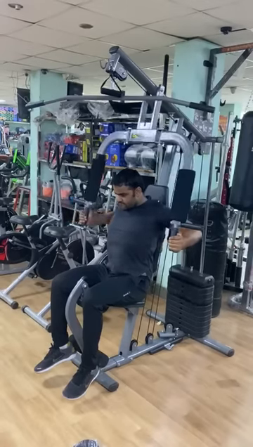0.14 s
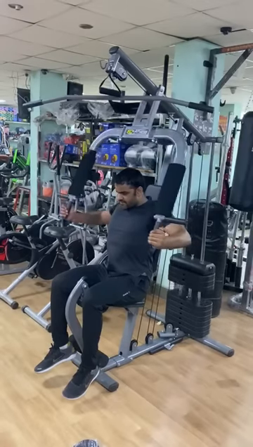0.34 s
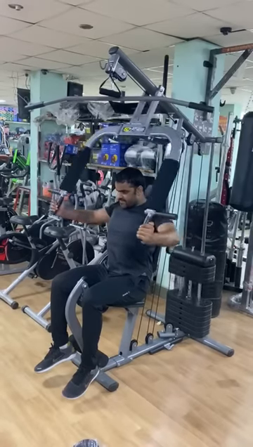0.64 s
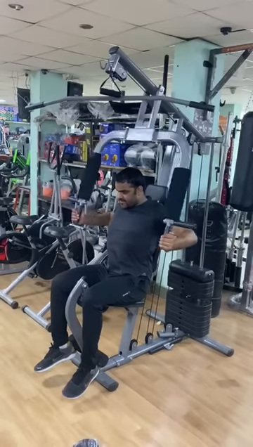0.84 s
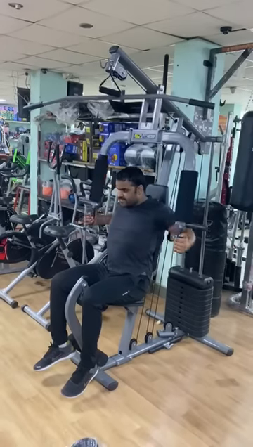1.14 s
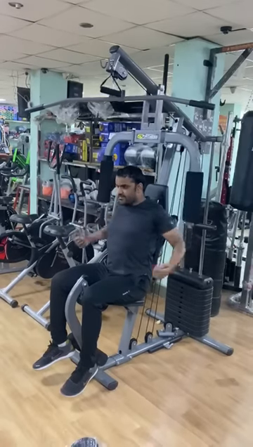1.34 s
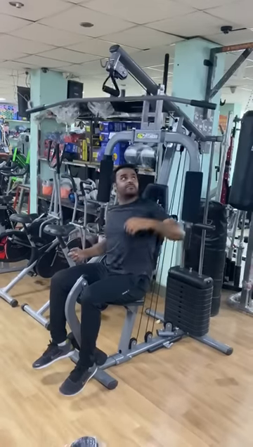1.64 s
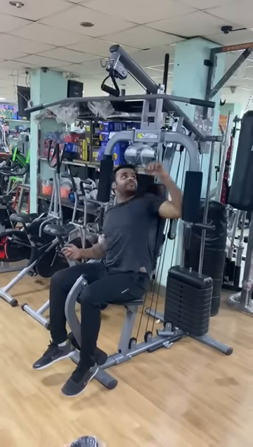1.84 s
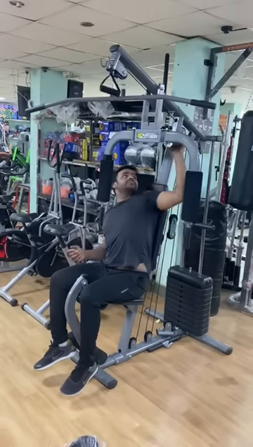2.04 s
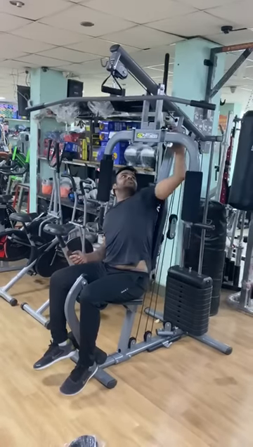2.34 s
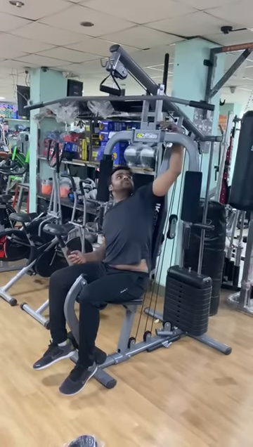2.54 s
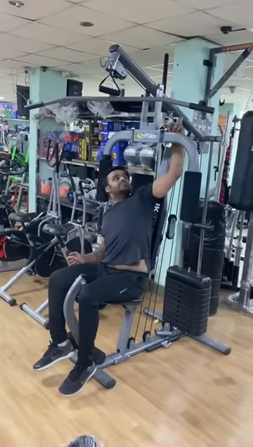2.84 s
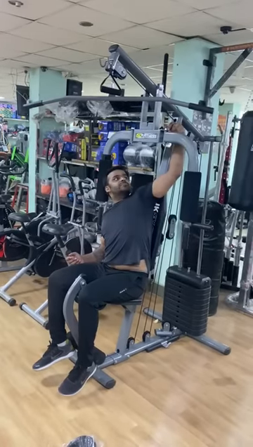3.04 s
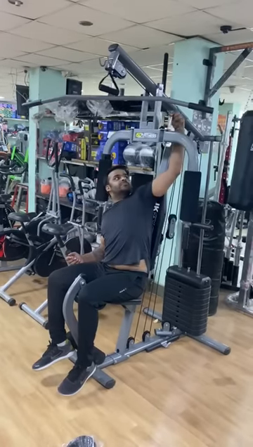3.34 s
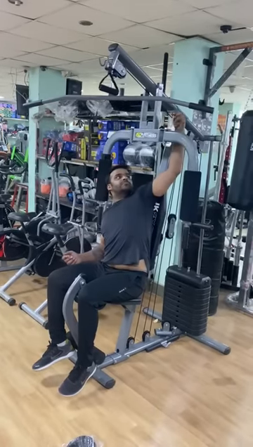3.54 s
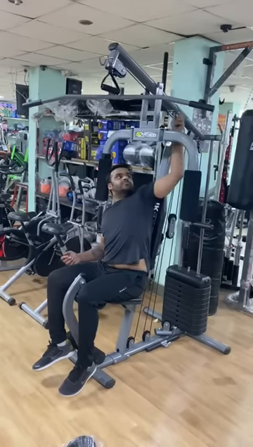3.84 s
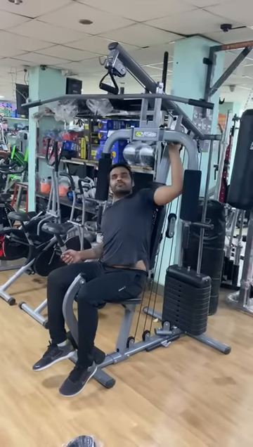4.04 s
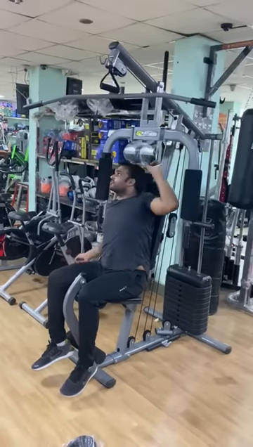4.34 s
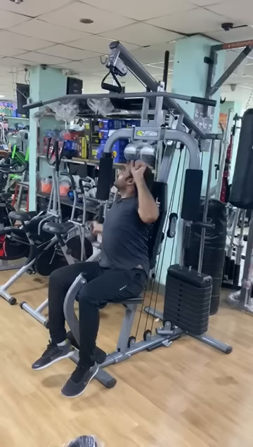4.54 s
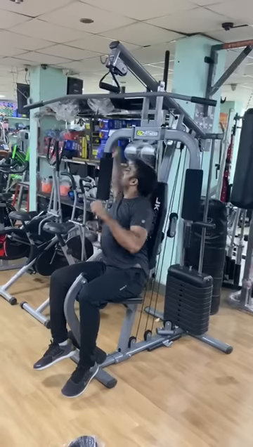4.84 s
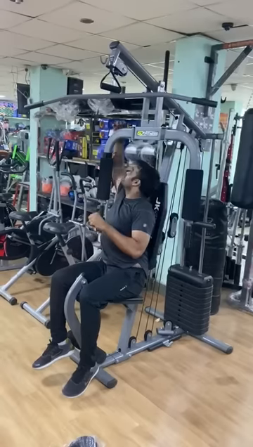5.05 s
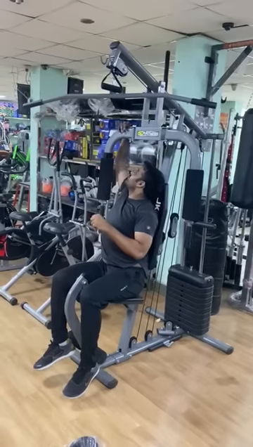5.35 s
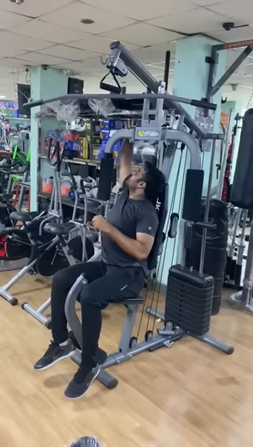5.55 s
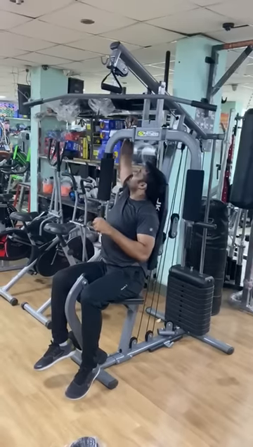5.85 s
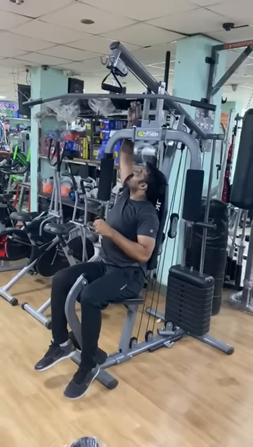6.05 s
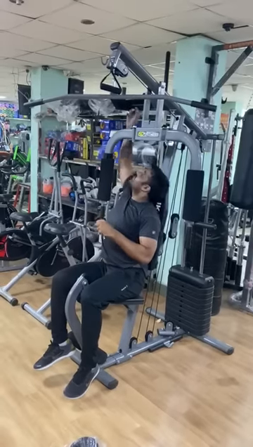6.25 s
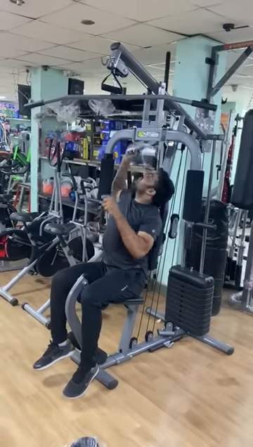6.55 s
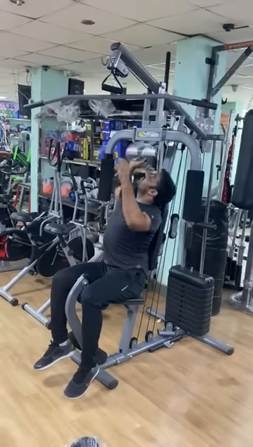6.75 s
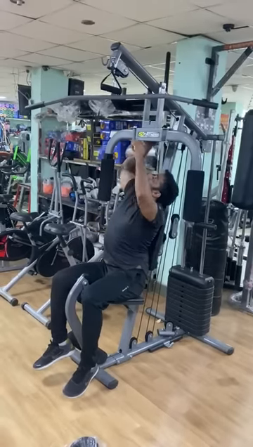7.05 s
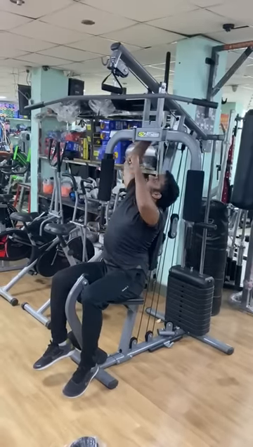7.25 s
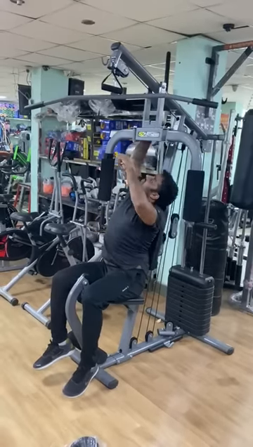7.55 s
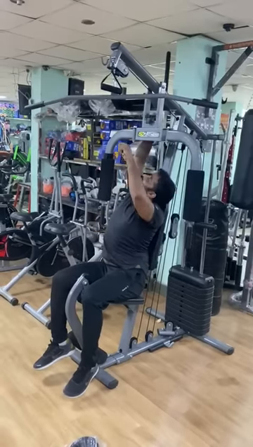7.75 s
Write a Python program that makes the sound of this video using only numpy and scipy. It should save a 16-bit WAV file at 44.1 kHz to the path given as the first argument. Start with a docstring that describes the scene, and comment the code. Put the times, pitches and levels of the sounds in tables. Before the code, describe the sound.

Gym machine in a humming room: brief squeal, stack landing and plate clatter, scattered metallic rattles and snaps, ending in hard steel knocks.

```python
"""A showroom with a multi-station gym: a pulley squeals, the weight stack lands and its plates clatter.
Then the steel fittings of the press arm are worked, first one, then another, and the arm knocks on the frame.
Behind this, hum, air noise and rumble hold steady, then swell; a far motor runs up, coasts down and fades.
The steel is noise bursts plus fading tones, the squeal is a buzz through resonances, and the background
is made of shaped noise and steady or gliding tones."""
import sys
import numpy as np
from scipy import signal
from scipy.fft import rfft, irfft, next_fast_len
from scipy.io import wavfile
from scipy.ndimage import uniform_filter1d

SR = 44100
rng = np.random.default_rng(int(sys.argv[2]) if len(sys.argv) > 2 else 0)


def wav_out(sig):
    """Save sig, one row per channel (or a flat mono array), as 16-bit PCM at SR to the path in sys.argv[1]."""
    wavfile.write(sys.argv[1], SR, np.round(np.clip(np.atleast_2d(sig).T, -1, 1) * 32767).astype(np.int16))


N = 348831
TIME = np.arange(N) / SR

# Hum: its pitch, the speed and reach of its pitch flutter, and a lower tone
HUM_HZ, HUM_FLUTTER_HZ, HUM_SWING_HZ, LOW_HUM_HZ = 278.2, 22.3, 16, 200
# Peak levels in the mid, before the swell
HUM_DB, LOW_HUM_DB = -51, -67
# Air noise, colour of the side: pitch_hz, level_db (per Hz, relative)
AIR_COLOUR = [(70, -8), (130, 1), (190, 0), (230, -3), (290, 1), (380, -5.5), (700, -7), (1100, -7),
              (1700, -16), (3000, -25), (5000, -27), (8500, -33), (11500, -43)]
# Air noise, mid compared with side: pitch_hz, gain_db
AIR_MID_COLOUR = [(100, 2), (200, 0.5), (330, -4.5), (470, -11.5), (1100, -8.5), (1700, -2), (3500, -1),
                  (5000, -8), (6200, -4), (8000, -43)]
# How much of the air noise's side follows its mid, so that it leans left: pitch_hz, share (0 to 1)
AIR_LEFT_SHARE = [(80, 0.3), (170, 1), (300, 0.92), (550, 0.44), (1500, 0.24), (4000, 0.057)]
# Air noise: loudness (rms) of the side, before the swell
AIR_SIDE_DB = -54
# Rumble colour: pitch_hz, level_db (per Hz, relative)
RUMBLE_COLOUR = [(20, -32), (36, -11), (48, -6.5), (60, 0), (72, -6), (95, -19), (160, -32), (800, -100)]
# Moments when the rumble surges: centre_s, width_s, lift_db
RUMBLE_SURGES = [(6.93, .1, 5.5), (7.65, .1, 4)]
# Rumble: loudness (rms) of the mid, before swell and surges
RUMBLE_DB = -51.5
# Hum, air and rumble hold steady, then swell together
SWELL_FROM_S, SWELL_DB_PER_S = 3.55, 2.5

# Far motor: climbs towards its top speed (time constant RUN_UP_S), is switched off and coasts down
MOTOR_START_HZ, MOTOR_TOP_HZ, RUN_UP_S = 79.5, 110, 6.4
MOTOR_OFF_S, COAST_HZ_PER_S = 5.38, 26
MOTOR_FADE_S, FADE_DB_PER_S = 5.78, 63
# The room booms at some motor pitches: pitch_hz, level_db (relative)
ROOM_BOOMS = [(79.5, -44), (83.3, -47), (84.7, -53), (87.5, -46.5), (89, -41.5), (90.5, -40.5),
              (91.7, -45.5), (94, -46), (96.5, -52)]

# Pulley slipping: start_s, length_s, level_db, upper_resonance_lift_db
SLIPS = [(.065, .03, -65, 0), (.105, .02, -58, -4), (.15, .045, -66, 8), (.2, .05, -73, 15),
         (.25, .035, -61, 0), (.31, .065, -60, 1), (.43, .04, -75, -2), (.52, .18, -78, -4)]
# Resonances of the pulley wheel: pitch_hz, width_hz, level_db (relative)
WHEEL_RESONANCES = [(2810, 140, 0), (3220, 100, -21), (3620, 60, -17), (4030, 80, -25)]
# Time constants of the rise before each slip and the fall after it
SQUEAL_ATTACK_S, SQUEAL_RELEASE_S, SQUEAL_FLUTTER_DB = .01, .014, 1.2

# All blows: start_s, level_db (relative within its group), hardness_db, thud_db, chatter_t60_s
# (a t60 is the time to fade by 60 dB)
# The whole stack lands on its buffers and rocks
STACK_BLOWS = [(.978, -34.5, -6, 13, 0.16), (1.082, -45.5, -18, 5.9, 0.11)]
# Loose plates settling
PLATE_BLOWS = [(1.140, -46.5, -18, 11, 0.097), (1.231, -35.5, -9, 10, 0.029), (1.253, -26, 1.5, -5, 0.023),
               (1.26, -29.5, 1.5, 4, 0.043), (1.278, -36, 1, -0.5, 0.13), (1.291, -37.5, -1, 0, 0.08),
               (1.301, -35, 3, 6.5, 0.076), (1.322, -43.5, -5.5, 5, 0.24), (1.385, -46.5, -8, 0, 0.15),
               (1.487, -46.5, -12, 0, 0.11)]
# First fitting rattling and snapping home
LATCH_BLOWS = [(2.803, -43, -20, -6, 0.11), (2.819, -46, -16, 1, 0.1), (3.108, -36, -6, -2, 0.064),
               (3.119, -36, 2.5, -0.5, .09), (3.163, -48, -1, 4, 0.1), (3.208, -43, 5.5, 1, 0.14),
               (3.226, -40, -3, 0, .07), (3.249, -35.5, -17.5, 3.5, 0.087), (3.266, -38.5, -2, -1, 0.095),
               (3.556, -32.5, -12.5, -3, 0.037), (3.975, -35, 28, 3, 0.034),
               (3.978, -26, 21.5, 10.5, 0.031), (3.996, -38.5, 2, 3, 0.034), (4.016, -41, 13, -1, 0.035),
               (4.047, -37, -3, 1, 0.053)]
# Second fitting worked loose
PIN_BLOWS = [(5.132, -41, -4.5, 7.5, 0.073), (5.144, -38, -12, 2, 0.062), (5.7, -36.5, -6, 1, 0.14),
             (5.818, -35, -3, -7, 0.074), (5.853, -38.5, -21, 1, 0.072), (5.872, -37.5, -20, 5, 0.034),
             (5.9, -48.5, -25, 5, 0.19), (5.982, -25, -6, 6, 0.032), (6.008, -48, -14, 5, 0.066)]
# Press arm knocking on the frame
ARM_BLOWS = [(7.083, -35.5, -8, 5, 0.2), (7.128, -26.5, -1.5, 0, 0.13), (7.155, -34.5, 14, 1, 0.13),
             (7.299, -27, 4.5, 6, 0.068), (7.535, -38.5, -20, 13, 0.1), (7.741, -17.5, 17, 9, 0.019),
             (7.746, -15.5, 5, -0.5, 0.05), (7.751, -22, 4, 6, 0.049), (7.767, -35, 5, 9, 0.056),
             (7.781, -28, 0, -4, 0.11), (7.793, -33.5, -7, -0.5, 0.11), (7.829, -19, 0, -7, 0.027),
             (7.857, -25.5, -5.5, -4, 0.16)]
# Light touches of loose fittings between the blows: start_s, level_db
LIGHT_TOUCHES = [(1.536, -57), (2.355, -64.5), (2.405, -64), (3.933, -55.5), (4.549, -53.5), (5.209, -60),
                 (5.296, -56.5), (5.406, -55), (5.64, -49), (7.455, -53), (7.62, -53), (7.705, -50)]
TOUCH_HARD_DB, TOUCH_THUD_DB, TOUCH_T60_S = -9, 1, 0.11

# Ringing tones of the plates: pitch_hz, level_db (relative)
PLATE_TONES = [(760, -19.5), (1162, -10), (1456, -9), (1900, -6.5), (2056, -7), (2252, -10), (2600, -14),
               (3445, -14), (6660, -7)]
# Ringing tones of the first fitting: pitch_hz, level_db (relative)
LATCH_TONES = [(468, -11), (590, -11), (772, -22.5), (1050, -13.5), (1224, -3), (1365, -13.5), (1895, 4),
               (2648, -8.5), (6400, -16.5)]
# Ringing tones of the second fitting: pitch_hz, level_db (relative)
PIN_TONES = [(800, -16), (1068, -11.5), (1219, 2), (1850, -0.5), (1950, 0.5), (2200, -15), (4075, -14.5),
             (4400, -9.5)]
# Ringing tones of the press arm: pitch_hz, level_db (relative)
ARM_TONES = [(634, -20), (963, -16.5), (1212, -23.5), (1251, -14), (1285, -21), (1602, -14), (1878, -22),
             (2132, -13), (2210, -8), (4425, -19), (5620, -17), (6320, -23)]
# Crowded short-lived tones of the tube frame, as one noise colour: pitch_hz, level_db (per Hz, relative)
FRAME_COLOUR = [(120, -3), (350, 2), (680, 9.5), (920, 11), (1200, 15.5), (2100, 16.5), (2900, 7.5),
                (4400, 5.5), (5300, -0.5), (6600, 5), (8500, -17.5), (11500, -43)]
# Lift of the side for steel and pulley: pitch_hz, gain_db
SIDE_LIFT = [(300, 4), (700, 7), (1500, 1.5), (2500, .5), (4000, 2.5), (5000, 5), (6300, 2.5), (7200, 7),
             (8500, 18), (11000, 22)]
# Hardness lifts the top in full and the upper mids by a share; SHARP_DB more of it halves the attack
BRIGHT_SHARE, SHARP_DB = 0.27, 38

# Short narrow ringing tones, mostly sounding together with the blows: start_s, pitch_hz, level_db, t60_s
SHORT_TONES = [(1.011, 3570, -38, 0.041), (1.176, 1855, -49.5, .06), (1.254, 3300, -33, 0.032),
               (1.25, 2383, -31, 0.054), (3.249, 1200, -39, 0.033), (3.976, 1333, -27, 0.046),
               (5.855, 1300, -38.5, 0.086), (7.749, 1254, -19, 0.071), (7.83, 5600, -18, 0.0098)]
TONE_BLUR_HZ, TONE_ATTACK_S = 70, .0007

# Tick of first contact: pitch_hz, level_db (per Hz, relative)
TICK_COLOUR = [(4000, -37.5), (7000, 16), (8500, 9), (10000, -11), (11500, -4)]
# Its level is relative to the blow's level plus hardness; the side is stronger than that
TICK_DB, TICK_T60_S, TICK_SIDE_DB = -24, 0.034, 16.5

# Room echo: fade times of its low, treble and top bands, and its level
ROOM_T60_S, ROOM_TREBLE_T60_S, ROOM_TOP_T60_S, ROOM_DB = 0.22, 0.24, 0.14, -3
TOP_HZ = 12200


def undb(db):
    """Turn decibels into a gain."""
    return 10 ** (np.asarray(db) / 20)


def unit(x):
    """Scale to an average strength (rms) of 1."""
    return x / np.sqrt(np.mean(x ** 2))


def fade(t, t60):
    """A natural die-away that drops 60 dB in t60 seconds."""
    return np.exp(-np.log(1000) * t / t60)


def shape(points, size):
    """Join (Hz, value) points on a log pitch axis, one value per transform bin."""
    hz, value = np.transpose(points)
    bin_hz = np.fft.rfftfreq(size, 1 / SR)
    return np.interp(np.log(bin_hz + 1), np.log(hz), value)


def colour(x, points):
    """Filter by (Hz, dB) points without sounding early: folding the cepstrum gives minimum phase."""
    size = next_fast_len(x.shape[-1] + 2048)
    cepstrum = irfft(np.log(undb(shape(points, size))), size)
    cepstrum[1:size // 2] *= 2
    cepstrum[size // 2 + 1:] = 0
    response = np.exp(rfft(cepstrum))
    return irfft(rfft(x, size) * response, size)[..., :x.shape[-1]]


def walk(rate):
    """Smooth random wander with a spread near 1, drawing a new value about rate times a second."""
    k = int(SR / rate)
    steps = np.repeat(rng.standard_normal(N // k + 1), k)
    return 1.3 * uniform_filter1d(uniform_filter1d(steps, k), k)[:N]


def stereo(mid, side):
    """Left is mid plus side, right is mid minus side."""
    return np.array([mid + side, mid - side])


def add(out, s, sound):
    """Mix a sound in at time s."""
    i = int(s * SR)
    out[:, i:i + sound.shape[1]] += sound[:, :N - i]


def hum(swell_db):
    """Electrical hum: a tone with quick pitch flutter over a weak low one; strong left, weak and inverted right."""
    turns = np.cumsum(1 + 0.00047 * walk(1.5)) / SR  # time with a slight pitch drift
    flutter = HUM_SWING_HZ / HUM_FLUTTER_HZ * np.sin(2 * np.pi * HUM_FLUTTER_HZ * turns)
    main = undb(HUM_DB) * np.sin(2 * np.pi * HUM_HZ * turns + flutter)
    low = undb(LOW_HUM_DB) * np.sin(2 * np.pi * LOW_HUM_HZ * turns)
    tones = (main + low) * undb(swell_db)
    return stereo(tones, undb(4.0) * tones)


def air(swell_db, flicker_db=0.85):
    """Broad ventilation noise, mostly opposite in the two channels, its low range leaning left."""
    size = next_fast_len(N)
    mid, other = rng.standard_normal((2, size))
    # the more the side follows the mid, the more the sum gathers on the left
    lean = np.clip(shape(AIR_LEFT_SHARE, size), -1, 1)
    side = irfft(lean * rfft(mid) + np.sqrt(1 - lean ** 2) * rfft(other), size)[:N]
    mid = colour(mid[:N], AIR_MID_COLOUR)
    mid, side = colour(np.array([mid, side]), AIR_COLOUR)
    level = undb(AIR_SIDE_DB + swell_db + flicker_db * walk(3.4))
    return stereo(mid, side) / np.std(side) * level


def rumble(swell_db):
    """Low-pitched noise with an occasional surge, nearly the same on both sides."""
    mid, other = unit(colour(rng.standard_normal((2, N)), RUMBLE_COLOUR))
    surge_db = sum(lift * np.exp(-((TIME - s) / width) ** 2) for s, width, lift in RUMBLE_SURGES)
    return stereo(mid, 0.073 * (mid + other)) * undb(RUMBLE_DB + swell_db + surge_db)


def motor(overtone_db=-22, waver_db=0.25):
    """A far motor's tone follows its speed up and down, and is loud where its pitch meets a room boom."""
    climb = np.exp(-np.minimum(TIME, MOTOR_OFF_S) / RUN_UP_S)
    driven_hz = MOTOR_TOP_HZ - (MOTOR_TOP_HZ - MOTOR_START_HZ) * climb
    hz = driven_hz - COAST_HZ_PER_S * np.maximum(TIME - MOTOR_OFF_S, 0)
    boom_db = np.interp(hz, *np.transpose(ROOM_BOOMS)) + 2
    fade_db = FADE_DB_PER_S * np.maximum(TIME - MOTOR_FADE_S, 0)
    turn = 2 * np.pi * np.cumsum(hz) / SR
    tone = np.sin(turn) + undb(overtone_db) * np.sin(2 * turn)
    drone = tone * undb(boom_db - fade_db + waver_db * walk(5.3))
    return stereo(drone, 0.25 * drone)


def pulley():
    """Uneven stick-slip, about 400 times a second, excites wheel resonances that each swell and dip alone."""
    cycles = np.cumsum(401.5 * (1 + .002 * walk(30) + .01 * walk(500)))[:SR] / SR
    # only the overtones near the wheel's resonances
    slipping = sum(np.cos(2 * np.pi * k * cycles) for k in (7, 8, 9, 10))
    out = np.zeros(N)
    for k, (hz, width, resonance_db) in enumerate(WHEEL_RESONANCES):
        grip = np.zeros(N)
        for s, length, db, lift_db in SLIPS:
            before = np.maximum(s - TIME, 0) / SQUEAL_ATTACK_S
            after = np.maximum(TIME - s - length, 0) / SQUEAL_RELEASE_S
            grip += undb(db + lift_db * (k > 0)) * np.exp(-before - after)
        wheel = unit(signal.lfilter(*signal.iirpeak(hz, hz / width, SR), slipping))
        flutter = undb(resonance_db + SQUEAL_FLUTTER_DB * walk(50.4))
        out += np.pad(wheel, (0, N - SR)) * grip * flutter
    return out


def blows(hits, tones, group_db, ring_db, ring_t60, attack_s, body_db, bright_db, top_db=-11.5):
    """Steel on steel: chattering frame noise plus the part's own fading tones; rows are mid and side."""
    t = np.arange(SR // 3) / SR
    out = np.zeros((2, N))
    hz, tone_db = np.transpose(tones)[:, :, None]
    for s, db, hard_db, thud_db, t60 in hits:
        # loose parts touch again and again, every 2 ms or so, with uneven force
        force = undb(4 * np.repeat(rng.standard_normal(len(t)), 80)[:len(t)])
        chatter = unit(colour(force * rng.standard_normal((2, len(t))), FRAME_COLOUR)) * fade(t, t60)
        # each blow lands on another spot, so strengths and pitches vary a little
        detune, spot = rng.standard_normal((2, len(hz), 1))
        start = rng.uniform(0, 2 * np.pi, (2, len(hz), 1))
        strength = undb(tone_db + ring_db + 2 * spot)
        waves = strength * np.sin(2 * np.pi * hz * (1 + .004 * detune) * t + start)
        ring = (waves * fade(t, ring_t60)).sum(axis=1)
        # heavy blows thud, hard edges are bright and start faster
        upper_db = bright_db + BRIGHT_SHARE * hard_db
        contact = [(700, thud_db), (1250, body_db), (2000, 0.0019), (3600, upper_db), (5000, upper_db),
                   (7200, hard_db), (10000, hard_db + top_db)]
        attack = 1 - np.exp(-t / attack_s * 2 ** (hard_db / SHARP_DB))
        add(out, s, undb(db + group_db) * colour((chatter + ring) * attack, contact))
    return out


def stack_landing():
    """The heavy stack lands and rocks: thuds with little ringing."""
    return blows(STACK_BLOWS, PLATE_TONES, group_db=-6.5, ring_db=-16, ring_t60=0.065,
                 attack_s=0.0016, body_db=-5.0, bright_db=-0.5)


def plates():
    """Loose plates settle against each other and ring clearly."""
    return blows(PLATE_BLOWS, PLATE_TONES, group_db=-6.5, ring_db=2.5, ring_t60=0.05,
                 attack_s=0.0036, body_db=0.5, bright_db=7)


def first_fitting():
    """A fitting rattles and snaps home, with short ringing."""
    return blows(LATCH_BLOWS, LATCH_TONES, group_db=-7.0, ring_db=0, ring_t60=0.043,
                 attack_s=0.0046, body_db=2.5, bright_db=7.5)


def second_fitting():
    """Another fitting is worked loose and rings at its own pitches."""
    return blows(PIN_BLOWS, PIN_TONES, group_db=-3.0, ring_db=-3.5, ring_t60=0.05,
                 attack_s=0.0021, body_db=-1.5, bright_db=7.0)


def press_arm():
    """The arm knocks on the frame and rings longest."""
    return blows(ARM_BLOWS, ARM_TONES, group_db=-6.5, ring_db=-3, ring_t60=0.14,
                 attack_s=0.002, body_db=3.0, bright_db=4.5)


def light_touches():
    """Loose fittings touch lightly: soft blows that mostly chatter."""
    hits = [(s, db, TOUCH_HARD_DB, TOUCH_THUD_DB, TOUCH_T60_S) for s, db in LIGHT_TOUCHES]
    return blows(hits, PIN_TONES, group_db=0, ring_db=-13, ring_t60=0.085,
                 attack_s=0.0027, body_db=-2, bright_db=7.5)


def ticks(hits):
    """The instant of contact gives a short high noise, stronger the harder the blow."""
    t = np.arange(SR // 20) / SR
    out = np.zeros((2, N))
    for s, db, hard_db, _, _ in hits:
        crack = unit(colour(rng.standard_normal((2, len(t))), TICK_COLOUR)) * fade(t, TICK_T60_S)
        add(out, s, undb(db + hard_db + TICK_DB) * crack)
    return stereo(out[0], undb(TICK_SIDE_DB) * out[1])


def short_tones():
    """Short narrow ringing tones, mostly sounding together with the blows; rows are mid and side."""
    t = np.arange(SR // 4) / SR
    out = np.zeros((2, N))
    for s, hz, db, t60 in SHORT_TONES:
        # a randomly straying phase blurs the tone
        jitter = uniform_filter1d(rng.standard_normal((2, len(t))), size=40)
        stray = np.cumsum(jitter, axis=1) * np.sqrt(2 * np.pi * TONE_BLUR_HZ / SR)
        start = rng.uniform(0, 2 * np.pi, (2, 1))
        tone = np.sin(2 * np.pi * hz * t + stray + start)
        attack = 1 - np.exp(-t / TONE_ATTACK_S)
        add(out, s, undb(db) * tone * attack * fade(t, t60))
    return out


def room(dry):
    """Shelves and goods scatter a short, dense echo of fading noise; its top dies first."""
    t = np.arange(SR * 3 // 5) / SR
    bands = [((100, 3000), ROOM_T60_S), ((3000, 7200), ROOM_TREBLE_T60_S), ((7200, 16000), ROOM_TOP_T60_S)]
    tail = np.zeros((2, len(t)))
    for edges_hz, t60 in bands:
        band_filter = signal.butter(6, edges_hz, "band", fs=SR, output="sos")
        tail += signal.sosfilt(band_filter, rng.standard_normal((2, len(t)))) * fade(t, t60)
    tail = unit(tail) / np.sqrt(len(t))
    return dry + undb(ROOM_DB) * signal.fftconvolve(dry, tail, axes=1)[:, :N]


def scene():
    """The machine in its room over the background."""
    swell_db = SWELL_DB_PER_S * np.maximum(TIME - SWELL_FROM_S, 0)
    background = hum(swell_db) + air(swell_db) + rumble(swell_db) + motor()
    steel = stack_landing() + plates() + first_fitting() + second_fitting() + press_arm() + light_touches()
    # the pulley goes equally into mid and side, so its direct sound leans left
    mid, side = room(pulley() + steel + short_tones())
    machine = stereo(mid, colour(side, SIDE_LIFT))
    contacts = ticks(STACK_BLOWS + PLATE_BLOWS + LATCH_BLOWS + PIN_BLOWS + ARM_BLOWS)
    return background + machine + contacts


def record(dry):
    """The phone cuts the top: a steep filter removes what lies above TOP_HZ."""
    return signal.sosfilt(signal.ellip(10, .2, 80, TOP_HZ, fs=SR, output="sos"), dry)


dry = scene()
out = record(dry)
wav_out(out)
```